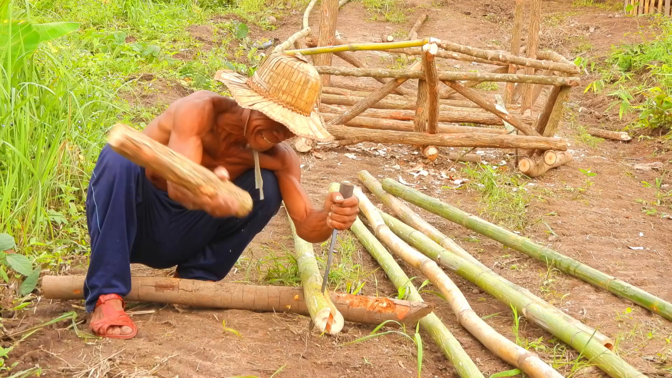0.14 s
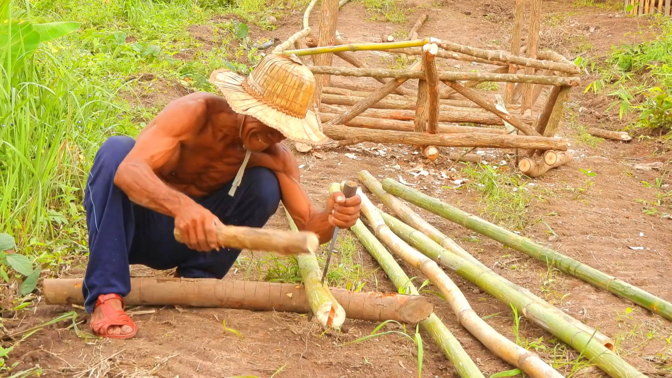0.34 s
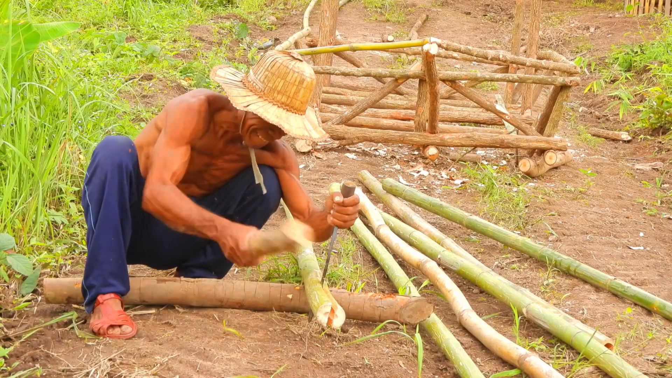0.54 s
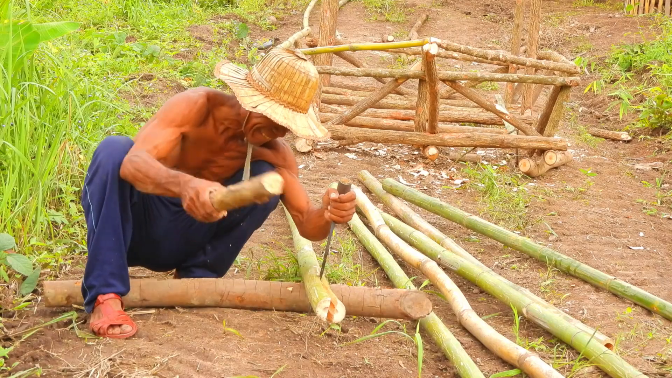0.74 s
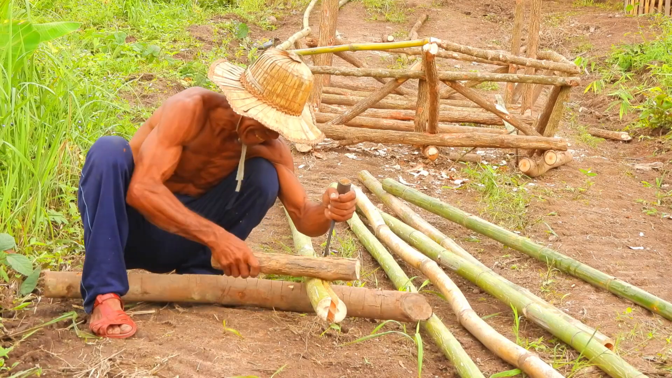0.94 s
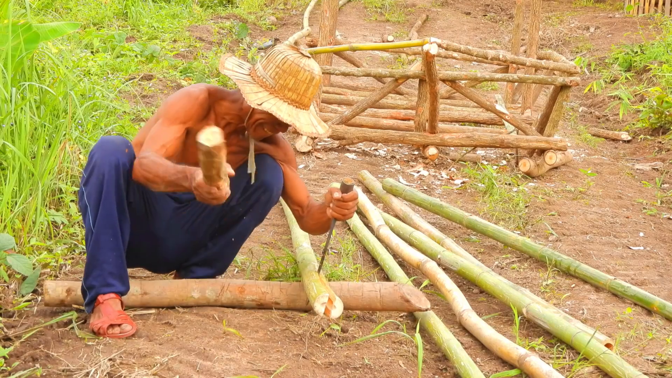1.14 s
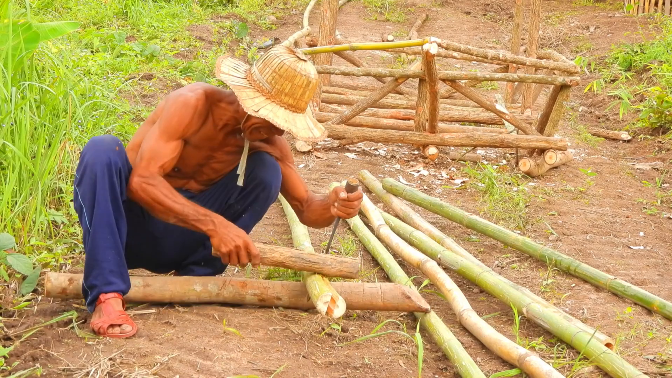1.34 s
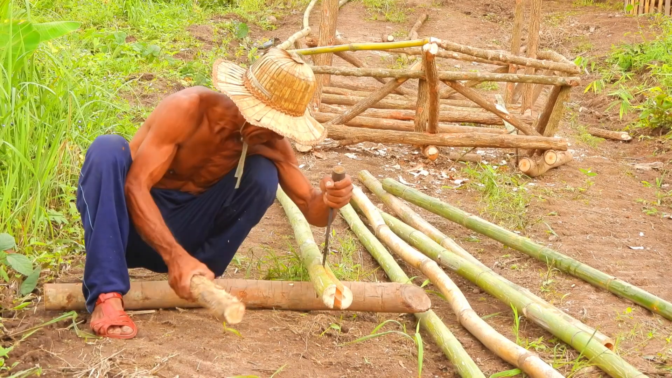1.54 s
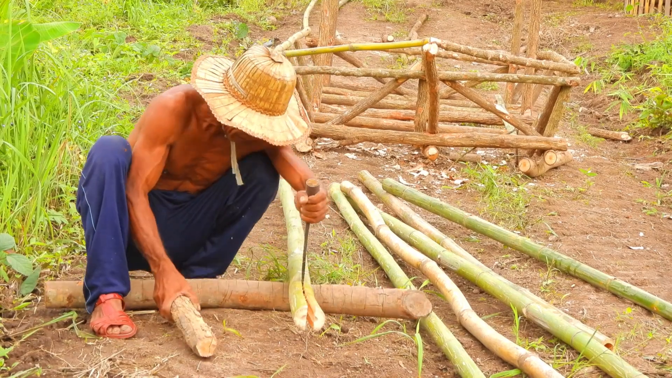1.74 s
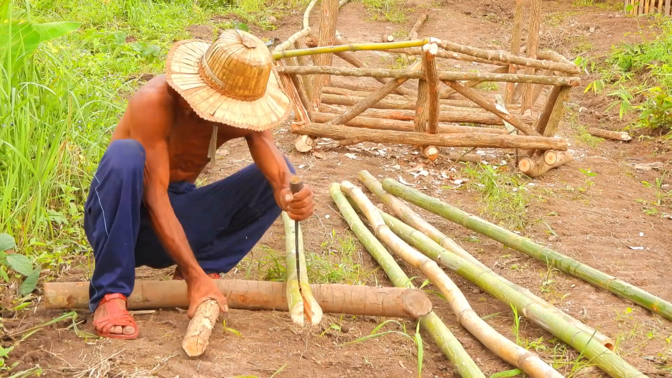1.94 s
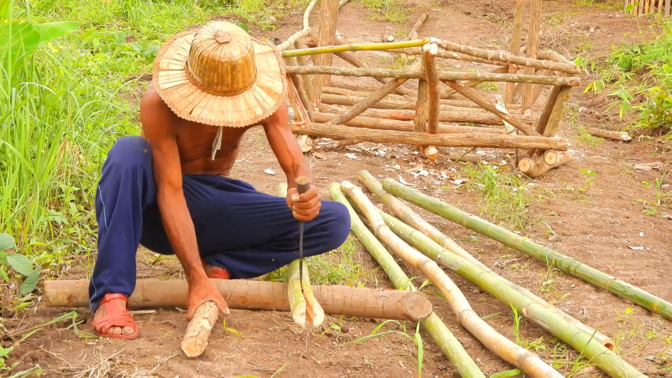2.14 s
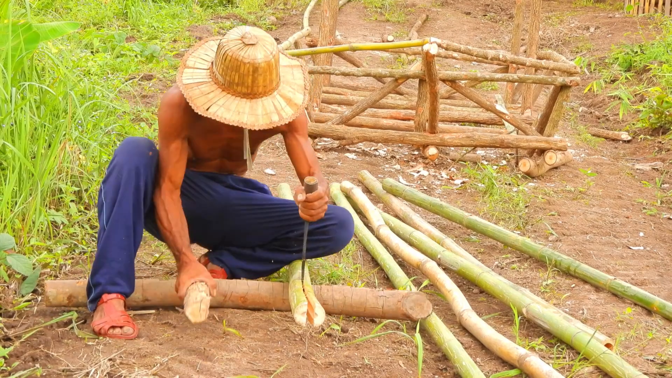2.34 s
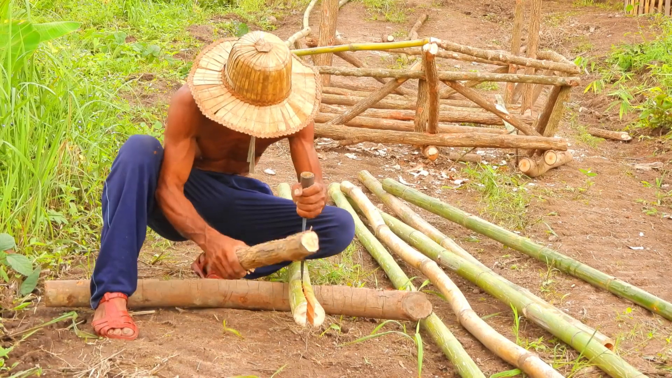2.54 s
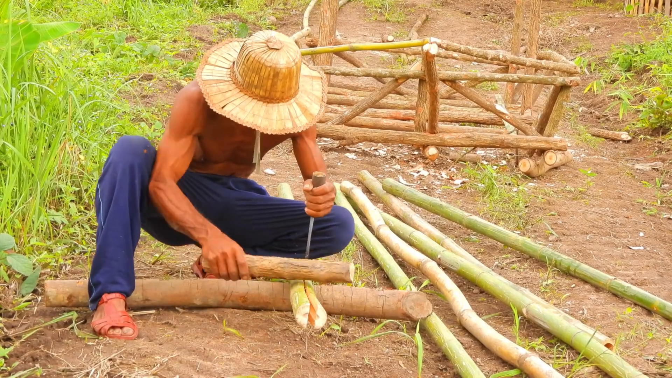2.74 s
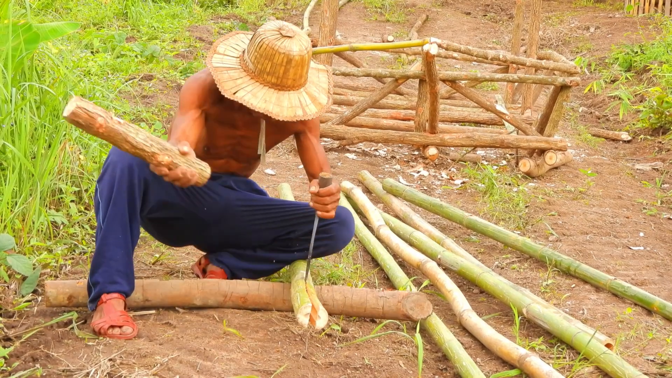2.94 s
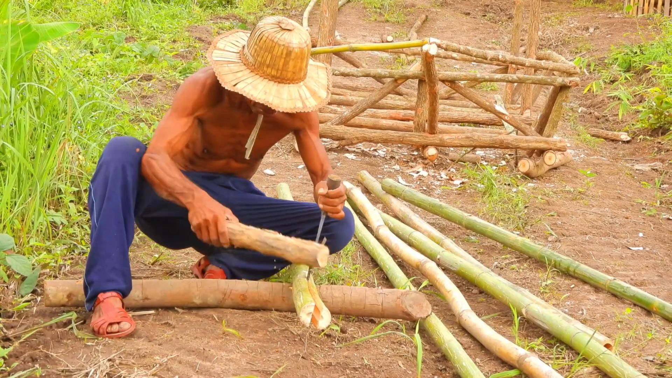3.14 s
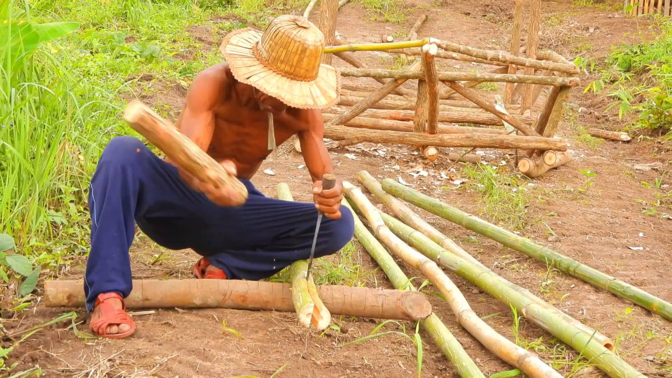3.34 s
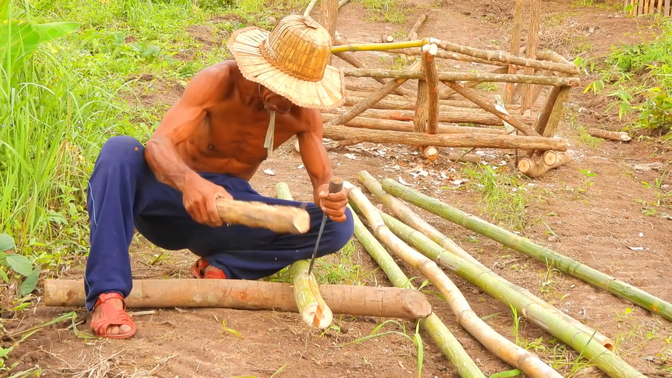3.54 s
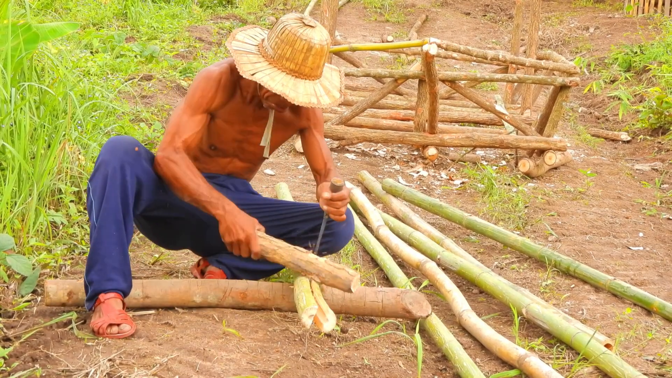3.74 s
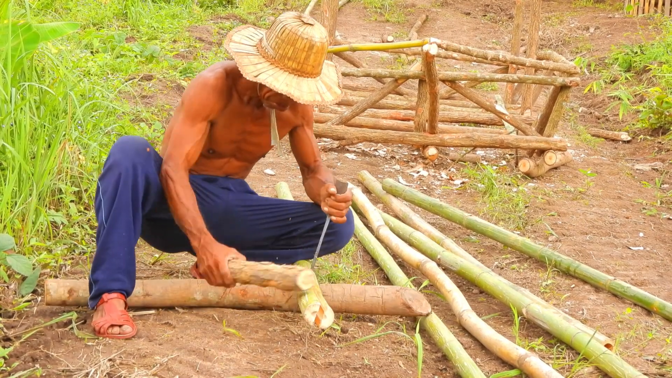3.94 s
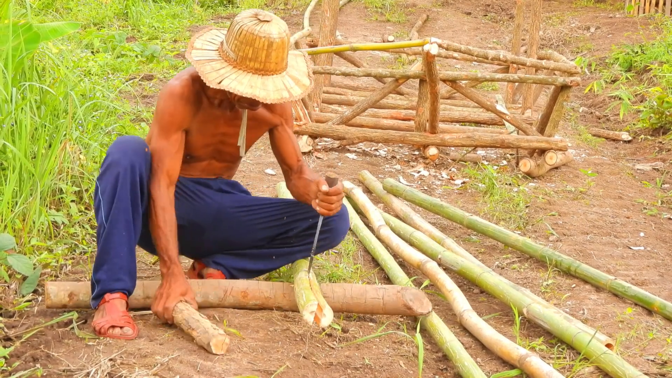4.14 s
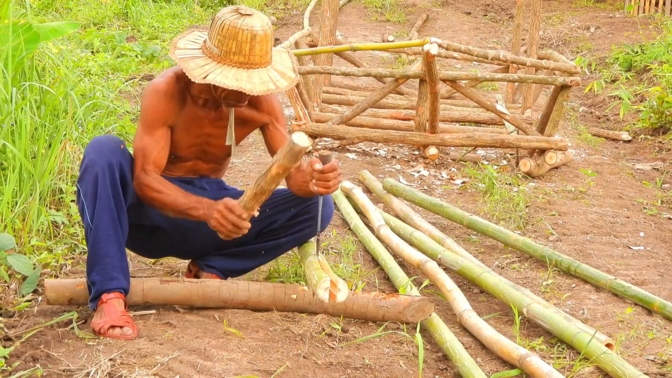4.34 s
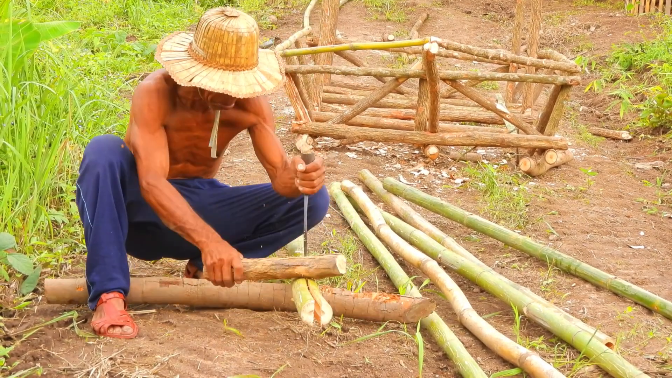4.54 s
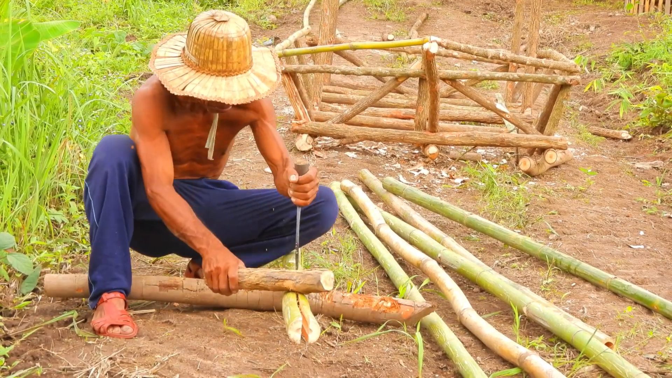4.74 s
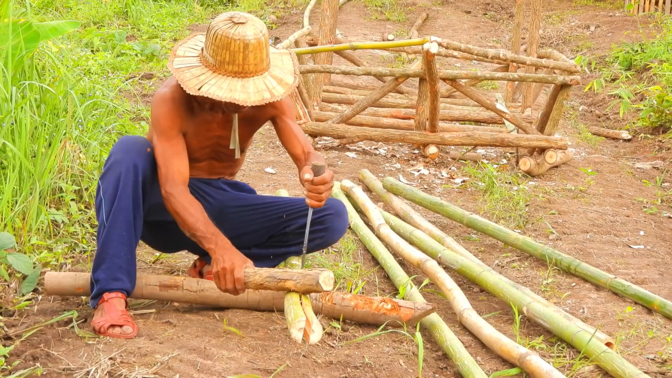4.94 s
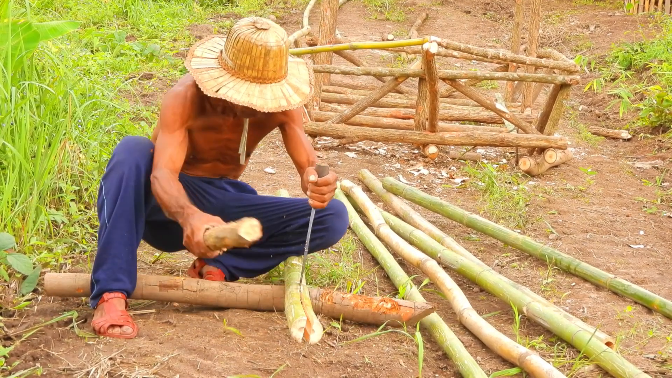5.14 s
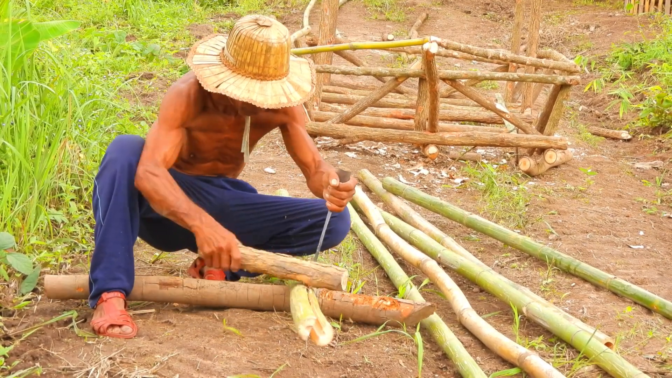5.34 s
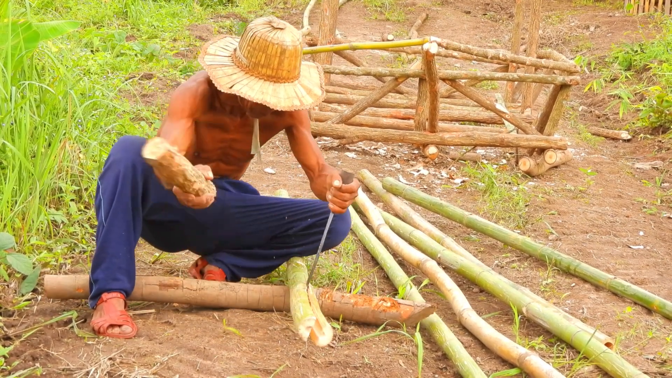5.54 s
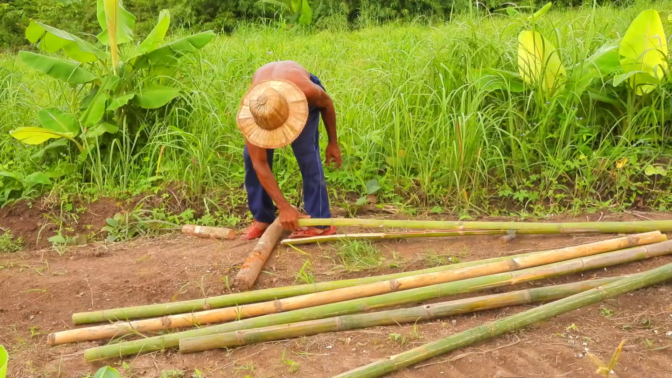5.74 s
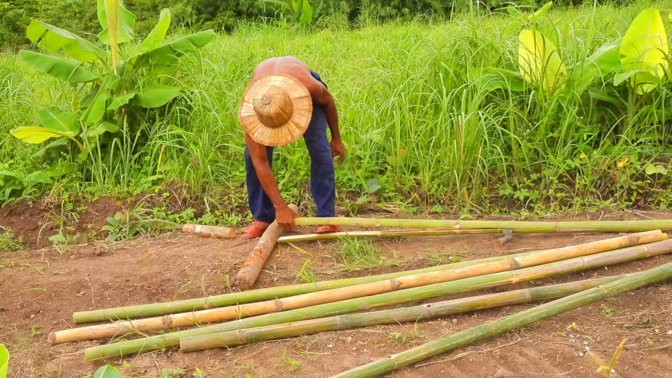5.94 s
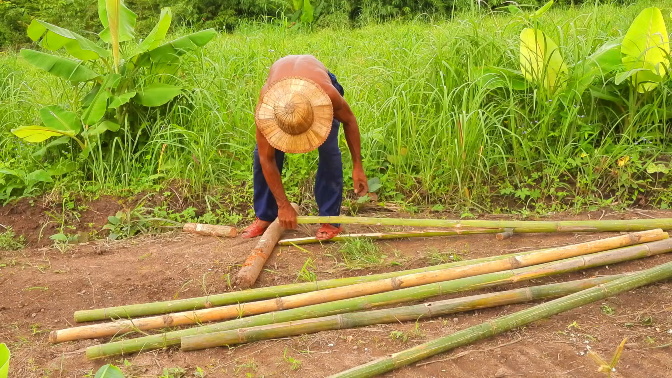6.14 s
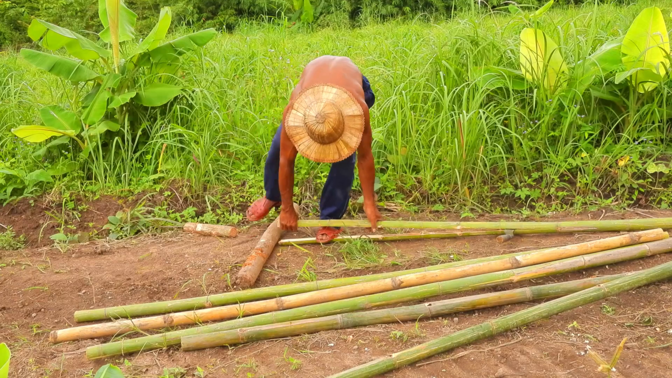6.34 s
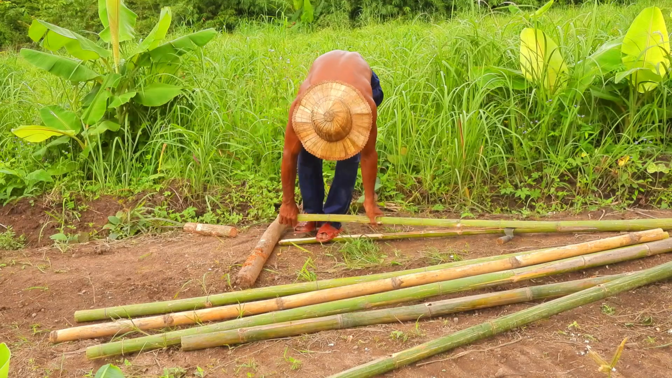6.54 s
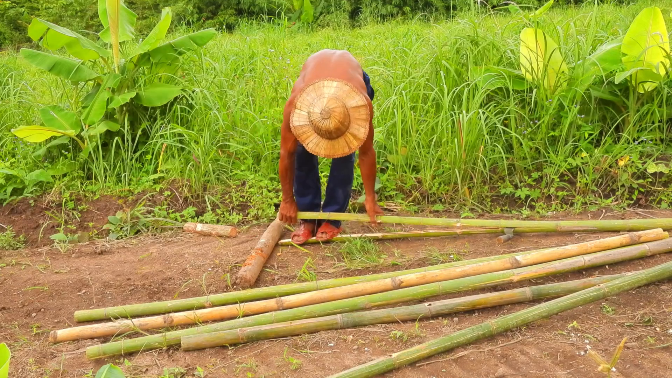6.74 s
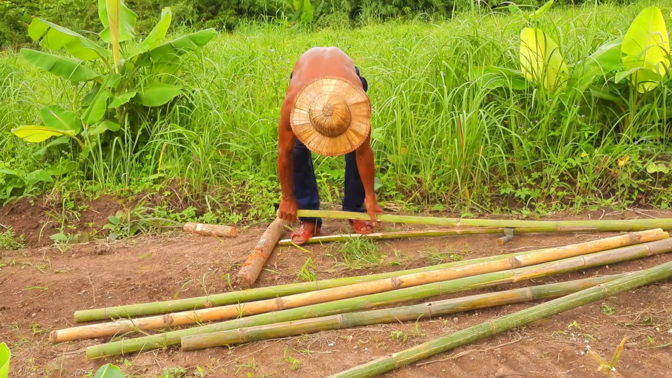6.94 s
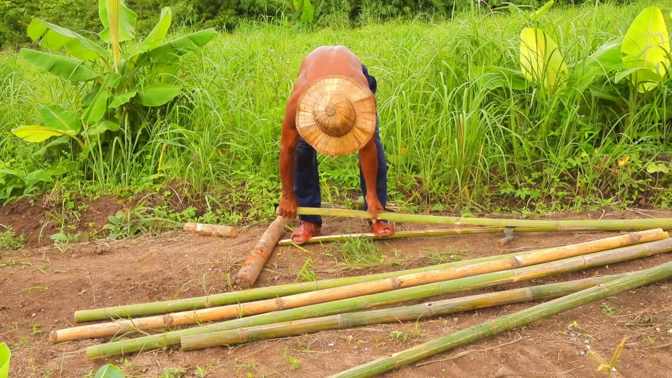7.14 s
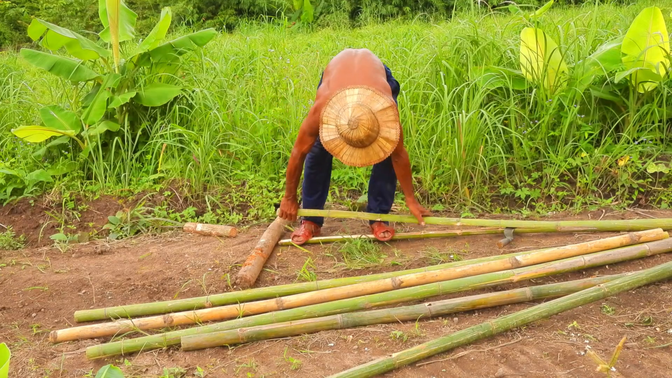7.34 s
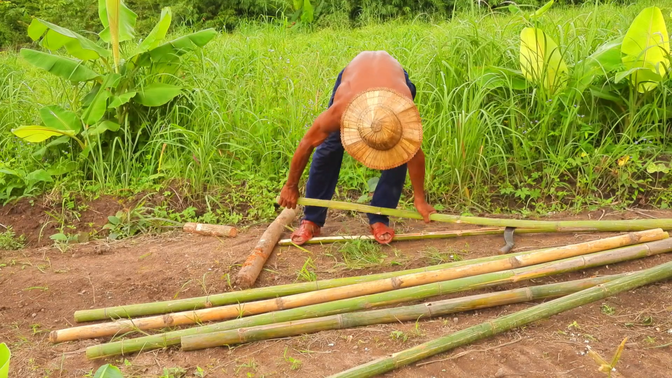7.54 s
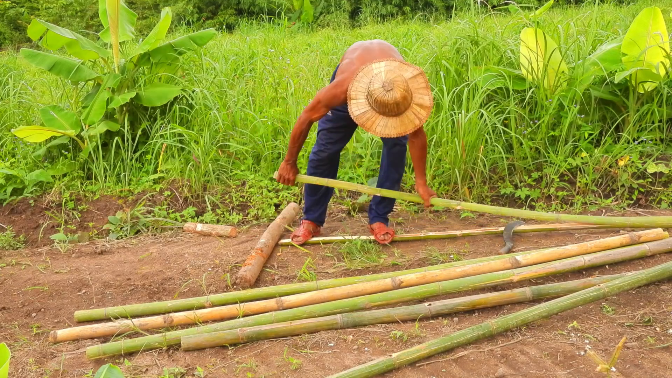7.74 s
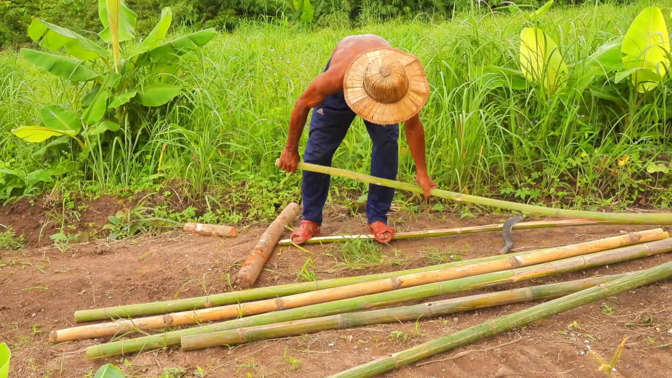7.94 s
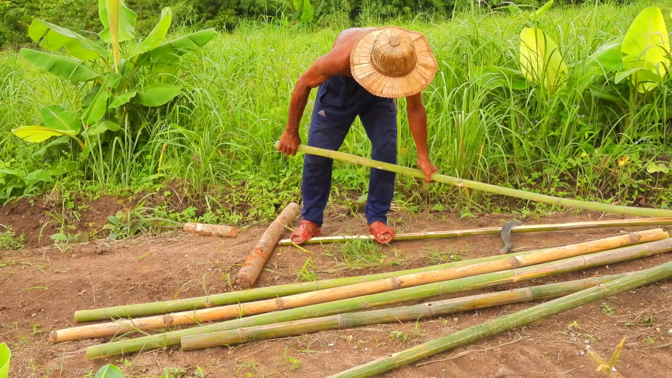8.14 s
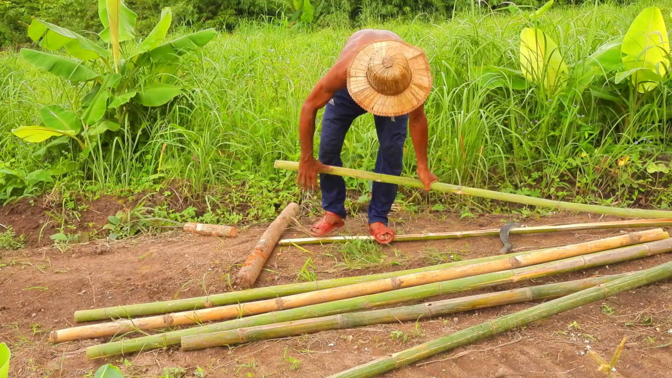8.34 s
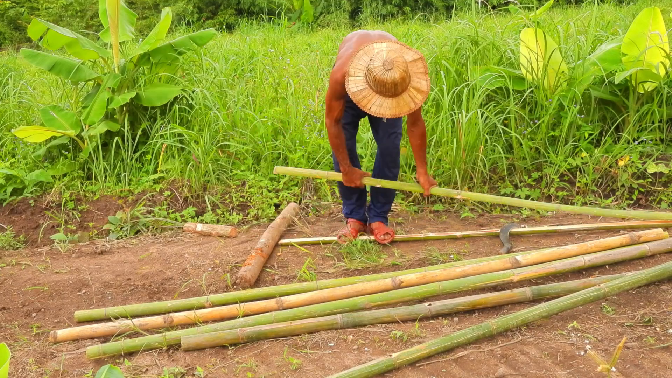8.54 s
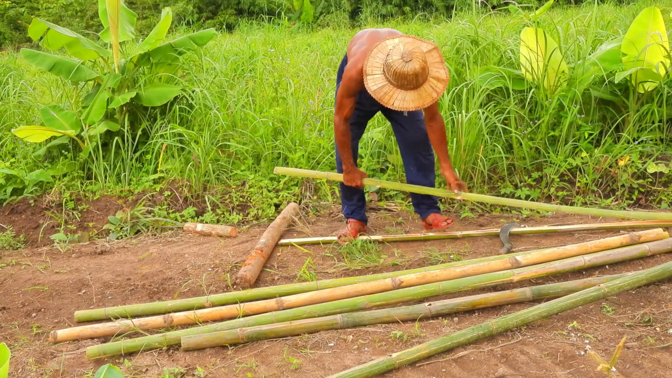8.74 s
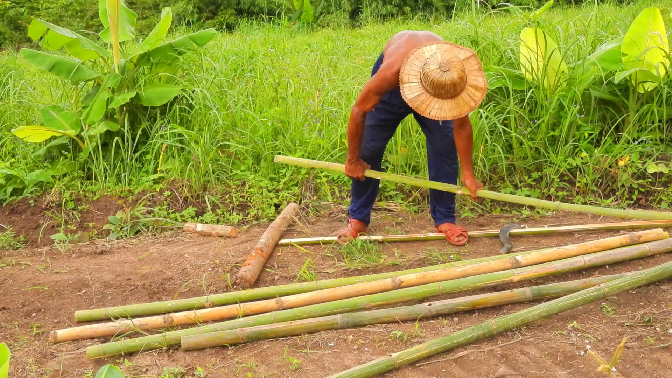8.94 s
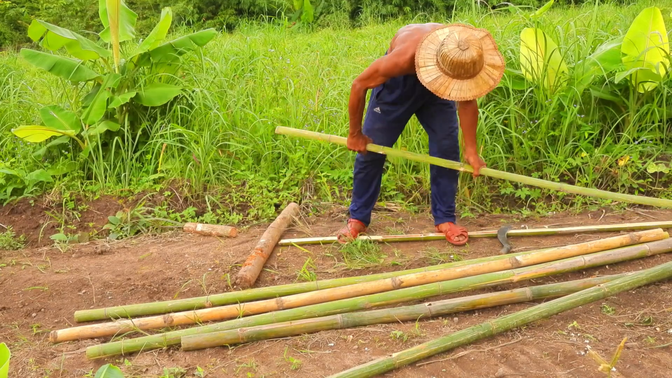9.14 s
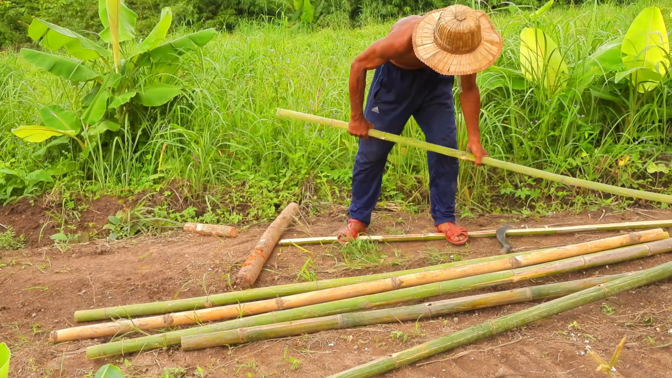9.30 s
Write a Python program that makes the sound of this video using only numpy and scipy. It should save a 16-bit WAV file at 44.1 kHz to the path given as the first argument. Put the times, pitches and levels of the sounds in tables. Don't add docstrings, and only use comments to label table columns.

```python
import sys
import numpy as np
from scipy import signal
from scipy.fft import rfft, irfft, next_fast_len
from scipy.io import wavfile
from scipy.ndimage import uniform_filter1d

SR = 44100
rng = np.random.default_rng(int(sys.argv[2]) if len(sys.argv) > 2 else 0)


def dump(signal):
    limited = np.clip(np.atleast_2d(signal).T, -1, 1)
    pcm = np.round(limited * 32767).astype(np.int16)
    wavfile.write(sys.argv[1], SR, pcm)


def boost(x):
    u = np.asarray(x, float) / 20
    return 10 ** u


N = 417627

# (top_s, peak_db, swell_ms, splinter_t60_ms, splinter_db)
BLOW_EVENTS = [(0.39, -7.3, 8.4, 42, -11), (0.755, -11.3, 7.2, 46, -6), (1.109, -13.6, 7.5, 50, -10),
               (1.474, -12.9, 6.7, 50, -9), (3.22, -9.9, 7.4, 44, -11), (3.586, -10.2, 7.95, 46, -7.5),
               (3.935, -13.2, 7.8, 45, -8.5), (4.644, -4.3, 7, 75, -10), (7.7655, -14, 1.2, 20, -3),
               (8.117, -15, 6.9, 56, -10.5), (9.222, -18.1, 7.85, 50, -9)]
# (pitch_hz, likeness)
WOOD_LIKENESS = [(100, 0.49), (400, 0.67), (1500, 0.56), (4000, 0.27), (15000, 0.18)]
# (pitch_hz, likeness)
FIELD_LIKENESS = [(60, 0.17), (240, 0.23), (950, 0.27), (3770, -0.05), (15000, -0.21)]
# (start_s, end_s)
SILENCE = (5.425, 5.703)
LEVER_S = 7.5


def evened(x):
    return x / np.sqrt(np.mean(x ** 2) + 1e-20)


def read(points, hz):
    f, value = np.transpose(points)
    return np.interp(np.log(hz + 1), np.log(f + 1), value)


def add(mix, s, sound, pan_db):
    part = mix[:, round(s * SR):][:, :sound.shape[1]]
    part += sound[:, :part.shape[1]] * boost([[pan_db / 2], [-pan_db / 2]])


def noise(spectrum, likeness, size):
    hz = np.fft.rfftfreq(size, 1 / SR)
    left, other = rfft(rng.standard_normal((2, size)))
    alike = np.clip(read(likeness, hz), -1, 1)
    right = alike * left + np.sqrt(1 - alike ** 2) * other
    return evened(irfft(np.array([left, right]) * boost(read(spectrum, hz)), size))


def resonate(x, hz, width_hz):
    turn = np.exp(2j * np.pi * np.cumsum(hz * np.ones(N)) / SR)
    r = np.exp(-np.pi * width_hz / SR)
    return evened((turn * signal.lfilter([1], [1, -2 * r, r * r], x / turn)).real)


def wander(per_s):
    knots = rng.standard_normal(1200)
    return np.interp(np.arange(N) / SR * per_s, np.arange(len(knots)), knots)


def smeared(u, swell_s, t60_s):
    after = np.maximum(u, 0)
    tail = boost(-60 * after ** 2 / (after + 1.1 * swell_s) / t60_s)
    return np.where(u < 0, np.exp(-.5 * (u / swell_s) ** 2), tail)


def rung(clock, u, hz, swell_s, t60_s):
    apart = np.arccos(np.clip(read(WOOD_LIKENESS, hz), 0, .8))
    phase = 2 * np.pi * rng.random() + rng.choice([-.5, .5]) * np.array([[1], [-1]]) * apart
    flutter_hz = rng.uniform(1.5, 3.5) * np.sqrt(hz)
    flutter = 1 + .35 * np.sin(2 * np.pi * (flutter_hz * clock + rng.random()))
    return smeared(u, swell_s, t60_s) * flutter * np.sin(2 * np.pi * hz * clock + phase)


def ducking(t):
    sinks_db = [9, 8.65, 3.5, 5.16, 5, 14, 8, 1.5, 18, 16, 13]
    sink_s, recover_db_per_s = 0.1, 15.5
    since = t - np.array(BLOW_EVENTS)[:, :1]
    sunk_db = np.array(sinks_db)[:, None] * np.clip(since / sink_s, 0, 1)
    sunk_db = sunk_db - recover_db_per_s * np.maximum(since - sink_s, 0)
    return -np.maximum(sunk_db.max(0), 0)


def hush():
    # (pitch_hz, level_db per Hz)
    hush_colour = [(35, -50), (60, -37.5), (301, 0), (1340, -0.5), (1780, -4), (2140, -1), (2970, -4),
                   (3940, -8.5), (6140, 0), (7060, -16), (8120, -7.5), (8710, -42), (10800, -28.5),
                   (11800, -45.5), (16000, -49.5)]
    return noise(hush_colour, FIELD_LIKENESS, next_fast_len(N))[:, :N] * boost(0.89 * wander(25))


def crickets(t):
    # (pitch_hz, width_hz, level_db over the hush, throbs_per_s, throb_depth_db)
    cricket_bands = [
        (4790, 90, -12, 50, 2.5),
        (8050, 250, -14, 30, 1.5),
        (10620, 500, -32, 28, 1.5),
        (2900, 25, -21, 7, 2.5),
        (7300, 300, -22, 12.75, 8),
    ]
    out = np.zeros((2, N))
    for hz, width_hz, db, per_s, depth_db in cricket_bands:
        throb = boost(depth_db * np.sin(2 * np.pi * per_s * t + wander(2)) + 1.5 * wander(6))
        farther_db = -5 * (t > SILENCE[0]) * (hz < 5000)
        out += boost(db + farther_db) * throb * resonate(rng.standard_normal((2, N)), hz, width_hz)
    return out


def phrases(t):
    # (top_s, level_db, pitch_hz before the top, pitch_hz at the top)
    cicada_phrases = [(.2, -51, 5900, 5850), (0.679, -52.5, 6050, 5950), (1.42, -53, 6100, 5910),
                      (1.92, -55.5, 5900, 5650), (2.25, -51.5, 5950, 5780), (2.74, -49, 5930, 6100),
                      (3.13, -52.5, 5750, 5750), (3.38, -50.5, 5900, 6050), (3.86, -53.5, 5700, 5900),
                      (4.6, -51.5, 5700, 6050), (5.14, -56.5, 5650, 5668), (5.328, -52, 5933, 6330),
                      (5.97, -53.5, 5850, 6000), (6.662, -53, 6336, 5900), (7.2, -57.5, 6250, 6340),
                      (7.34, -56.5, 5900, 5770), (8.342, -53, 6070, 6300), (8.96, -51.5, 6250, 5830),
                      (9.18, -54, 5850, 6050), (9.44, -45.5, 5950, 5980)]
    rise_s, fall_s, glide_s = 0.14, 0.044, 0.12
    drone_db, drone_hz = -61, 5900
    top, db, from_hz, top_hz = np.transpose(cicada_phrases)[:, :, None]
    u = t - top
    power = boost(2 * db) * np.exp(-(u / np.where(u < 0, rise_s, fall_s)) ** 2)
    hz = top_hz + (from_hz - top_hz) * np.clip(-u / glide_s, 0, 1)
    drone = boost(2 * drone_db)
    total = power.sum(0) + drone
    return 10 * np.log10(total), ((power * hz).sum(0) + drone * drone_hz) / total


def cicadas(t, pitch_hz):
    bursts = (np.cumsum(32 * (1 + 0.18 * wander(7.4))) / SR) % 1
    falling_hz = 1.4 * pitch_hz - 2300 + 350 * (.5 - bursts) + 60 * wander(10.0)
    ribs = rng.standard_normal((2, N)) * (.3 + np.sin(np.pi * bursts) ** 2) * boost(2.5 * wander(15))
    far_gain = 0.96 * boost(3 * wander(5.9) - 5.8 * (t > SILENCE[0]))
    far = far_gain * resonate(rng.standard_normal((2, N)), 5680, 120)
    return resonate(ribs, falling_hz, 450) + far


def patchy(field_sound, t, hush_db):
    kept = [(3700, 0), (4000, -5), (4300, 0), (5050, 0), (5250, -5), (5450, 0),
            (8200, 0), (8400, -12), (10000, -8), (10300, 0), (11400, 0), (11700, -30)]
    patch_depth = [(150, 3), (800, 2), (8300, 2), (9000, 6), (10300, 3), (11000, 3), (11600, 6)]  # (Hz, dB)
    hz, s, z = signal.stft(field_sound, SR, nperseg=1024, noverlap=768)
    patches = uniform_filter1d(rng.standard_normal(z.shape[1:]), 5, 0)
    patches = evened(uniform_filter1d(patches, 8, 1))
    thinning = (0.31 * (hz > 3100) + .3 * (hz < 600))[:, None]
    thinned_db = thinning * np.minimum(np.interp(s, t, hush_db) + 58.0, 0)
    z = z * boost(read(kept, hz)[:, None] + read(patch_depth, hz)[:, None] * patches + thinned_db)
    return signal.istft(z, SR, nperseg=1024, noverlap=768)[1][:, :N]


def field():
    t = np.arange(N) / SR
    s = t[::64]
    ducked_db, cicada_db, cicada_hz = (np.interp(t, s, curve) for curve in (ducking(s), *phrases(s)))
    hush_db = -58 + 1.5 * (t > SILENCE[0]) + ducked_db
    both = boost(hush_db - 0.02) * (hush() + crickets(t))
    both += boost(cicada_db + ducked_db - 5.0) * cicadas(t, cicada_hz)
    return patchy(both, t, hush_db)


def birds(mix):
    # (start_s, length_s, start_hz, end_hz, level_db)
    whistles = [(2.12, .25, 2420, 2160, -63), (2.1, .1, 830, 820, -62), (1.98, .25, 1650, 1620, -69),
                (2.5, .15, 1540, 1500, -66), (2.87, .22, 2350, 2150, -70), (6.74, .2, 2300, 2150, -61),
                (8.39, .23, 2330, 2170, -68), (2.57, .25, 460, 460, -62), (.44, .12, 2400, 2380, -65),
                (.57, .1, 2740, 2730, -71), (5.3, .13, 2900, 2880, -61), (8.97, .16, 2890, 2740, -52),
                (9.1, .12, 1150, 1060, -55), (9.22, .18, 1150, 1130, -58), (9.25, .07, 3900, 3900, -64),
                (9.225, .08, 2150, 2150, -52), (9.25, .1, 2740, 2720, -60), (9.24, .07, 3150, 3150, -61),
                (7.77, .12, 2730, 2720, -67), (7.85, .1, 2720, 2720, -73), (7.765, .07, 3140, 3130, -60),
                (7.8, .1, 1150, 1140, -69), (7.17, .04, 3400, 3300, -60), (4.2, .45, 2920, 2900, -66),
                (4.75, .7, 2910, 2890, -66)]
    for s, length_s, start_hz, end_hz, db in whistles:
        u = np.arange(round(length_s * SR)) / (length_s * SR)
        blur_hz = .12 * end_hz * uniform_filter1d(rng.standard_normal(len(u)), 300)
        hz = end_hz + (start_hz - end_hz) * (1 - u) ** 2.2 + blur_hz
        flutter_turns = u * length_s * rng.uniform(15, 40, (2, 1)) + rng.random((2, 1))
        flutter = 1 + .5 * np.sin(2 * np.pi * flutter_turns)
        tone = np.sin(2 * np.pi * (np.cumsum(hz) / SR + .2 * rng.random((2, 1))))
        add(mix, s, boost(db - 1.5) * tone * flutter * signal.windows.tukey(len(u), .5), 0)


def rustles(mix):
    # (middle_s, swell_s, level_db, brightest_hz)
    brushes = [(1.884, .009, -47.5, 5940), (2.86, 0.01, -54, 8000), (6.78, 0.2, -63, 634),
               (5.948, 0.012, -55, 1980), (6.41, 0.044, -60, 3620), (6.88, 0.036, -58.5, 3750),
               (7.28, 0.015, -68, 6000), (6.64, 0.05, -69, 6000), (4.105, 0.004, -58, 4000),
               (1.78, 0.025, -69, 6000), (7.705, 0.015, -44.5, 2350), (7.756, 0.008, -31, 1570),
               (9.472, 0.0064, -40, 3000)]
    u = np.arange(8192) / SR - .09
    for s, swell_s, db, hz in brushes:
        colour = [(.1 * hz, -22), (.5 * hz, -5), (hz, 0), (1.7 * hz, -12), (min(3.6 * hz, 16000), -40)]
        brush = noise(colour, WOOD_LIKENESS, len(u))
        steps = np.repeat(rng.standard_normal(128), 64)
        grains = boost(2.2 * evened(uniform_filter1d(steps, size=64)))
        add(mix, s + u[0], boost(db) * brush * grains * np.exp(-.5 * (u / swell_s) ** 2), 0)


def knock(row, swell_s, top_hz):
    # (pitch_hz, level_db per Hz)
    snap_colour = [(59, -73), (100, -36.5), (535, -29), (836, -8), (1250, -9), (2040, -4), (2750, -11),
                   (2990, -7.5), (9210, -16), (16000, -45)]
    s, db, hz, t60_s, snap_db = row
    u = np.arange(8192) / SR - .03
    thud = rung(u, u, hz, swell_s, t60_s)
    thud = thud + 0.53 * rung(u, u, 1.374 * hz, swell_s, 0.82 * t60_s)
    thud = thud + 0.14 * rung(u, u, 2.1 * hz, swell_s, 0.43 * t60_s)
    snap = boost(snap_db) * noise(snap_colour, WOOD_LIKENESS, len(u)) * smeared(u, swell_s, t60_s)
    snap = signal.lfilter(*signal.butter(2, top_hz, fs=SR), snap)
    pan_db = -0.5 if s > LEVER_S else .5
    return s + 1.8 * swell_s + u[0], boost(db - 8) * (thud + snap), pan_db


def knocks_and_snaps(mix):
    # (start_s, peak_db, ring_hz, t60_s, snap_db)
    dull_knocks = [(1.873, -37, 282, 0.25, -9), (1.89, -34, 200, 0.12, -12), (1.877, -36, 590, 0.1, -4),
                   (2.86, -43, 270, 0.1, 1), (2.865, -48, 1150, 0.07, -3), (4.108, -48, 750, 0.052, 0.5),
                   (4.249, -40, 230, 0.029, -7), (5.284, -24.5, 625, 0.01, -8),
                   (5.362, -33, 740, 0.028, -25), (5.371, -31, 620, 0.03, -15),
                   (5.955, -40, 700, 0.04, -14), (6.112, -38, 350, 0.03, -10),
                   (5.783, -36, 585, 0.04, -10.5), (6.109, -33.5, 672, 0.06, -26),
                   (8.932, -34, 980, 0.05, -3), (8.949, -35, 940, 0.049, -4), (9.268, -26, 966, 0.04, -6),
                   (9.255, -34, 1280, 0.06, -8), (9.172, -48, 1500, 0.03, 4)]
    # (start_s, peak_db, ring_hz, t60_s, snap_db)
    fibre_snaps = [(6.539, -54, 754, 0.061, 8), (6.726, -50, 774, 0.084, 7.5),
                   (7.538, -40.5, 1390, 0.055, 4), (7.532, -44, 820, 0.08, -6), (7.585, -46, 874, 0.1, 5),
                   (7.597, -46, 1900, 0.06, 3), (7.651, -39.5, 1950, 0.0359, 8),
                   (7.688, -38.5, 2100, 0.08, 2), (7.703, -38, 2050, 0.06, 2), (7.747, -28, 1330, 0.04, -2),
                   (7.717, -17, 2040, 0.022, 2), (7.729, -27, 2000, 0.04, 5), (7.808, -38, 930, 0.03, -5),
                   (8.038, -61, 1640, 0.15, 6), (8.058, -56.5, 1300, 0.04, 6), (9.199, -32, 1000, 0.03, 2),
                   (6.87, -56, 900, 0.03, 8)]
    # (start_s, peak_db, ring_hz, t60_s, snap_db)
    pole_burst = (4.6375, -10, 1550, .02, -6)
    hardest_s = BLOW_EVENTS[7][0]
    for row in dull_knocks:
        add(mix, *knock(row, .0018 if hardest_s < row[0] < LEVER_S else .0032, 2340))
    for row in fibre_snaps:
        add(mix, *knock(row, 0.001, 15000))
    add(mix, *knock(pole_burst, .0008, 15500))


def through(x, ring_hz, width_hz, top_db):
    between_db = -4
    hz = np.fft.rfftfreq(x.shape[1], 1 / SR)
    near = (1 / (1 + ((hz - np.array(ring_hz)[:, None]) / width_hz) ** 2)).max(0)
    shape_db = between_db * (1 - near) * (hz < 5500) + top_db * np.clip(hz / 7000 - 1, 0, 1)
    return irfft(rfft(x) * boost(shape_db), x.shape[1])


def splintering(clock, u, ring_hz, swell_s, t60_s, treble_db, top_db):
    # (pitch_hz, level_db per Hz)
    torn_colour = [(35, -75), (60, -53), (227, -16), (417, -12), (715, -4), (1040, -5.5), (1220, -4),
                   (2000, -9.5), (3760, -19.5), (4030, -21.5), (4750, -19.5), (6400, -22.5), (16000, -46)]
    torn = through(noise(torn_colour, WOOD_LIKENESS, len(u)), ring_hz, 60, top_db)
    dull = signal.lfilter(*signal.butter(3, 5500, fs=SR), torn)
    hiss = boost(treble_db - 3) * (torn - dull) * smeared(clock, 1.25 * swell_s, 0.7 * t60_s)
    return dull * smeared(u, swell_s, 0.95 * t60_s) + hiss


def field_edge(clock, ring_hz, swell_s, echo_db):
    far_colour = [(100, -30.5), (300, -12.5), (1200, -0.5), (4000, -9), (9000, -34), (12000, -60)]  # (Hz, dB)
    answer = boost(echo_db - 44.5) * smeared(clock - .065, 0.0096, 0.047)
    answer = answer + boost(-41) * smeared(clock, swell_s, 0.76)
    return through(noise(far_colour, FIELD_LIKENESS, len(clock)), ring_hz, 35, 0) * answer


def blow(event, rings, thud, walls, bearing):
    s, db, swell_ms, t60_ms, splinter_db = event
    thud_db, thud_hz, thud_t60_s, treble_db = thud
    wall_db, hold_ms, top_db, echo_db, pan_db = bearing
    clock = np.arange(16384) / SR - .05
    u = clock - np.clip(clock, 0, max(hold_ms, 0) / 1000)
    swell_s = swell_ms / 1000
    rings = list(rings) + [(hz, d + wall_db, 3.5 / width_hz) for hz, width_hz, d in walls]
    ring_hz = [ring[0] for ring in rings]
    body = sum(boost(d) * rung(clock, u, hz, 1.057 * swell_s, 0.6 * np.clip(t60_s, .02, .16))
               for hz, d, t60_s in rings)
    crack = splintering(clock, u, ring_hz, swell_s, t60_ms / 1000, treble_db, top_db)
    sound = body / abs(body).max() + boost(splinter_db + 2.1) * crack
    sound = boost(db) * (sound + field_edge(clock, ring_hz, swell_s, echo_db))
    earth = boost(thud_db - 3) * rung(clock, u, thud_hz, 1.4 * swell_s, thud_t60_s)
    return s + clock[0], sound + earth, pan_db


def blows(mix):
    # (pitch_hz, level_db, t60_s)
    early_rings = [
        [(716.0, 3.7, 0.067), (850.0, -11.5, 0.2), (1220.0, 4.1, 0.04), (1387.0, -8.5, 0.1),
         (1630.0, -10.3, 0.04), (1920.0, -15.1, 0.072), (2670.0, -14.5, 0.058), (3220.0, -11.3, 0.055)],
        [(600.0, -1.0, 0.04), (833.0, -6.5, 0.079), (1193.0, -2.4, 0.031), (1810.0, -0.9, 0.038),
         (1490.0, -13.2, 0.07), (2060.0, -14.3, 0.06), (2350.0, -4.8, 0.043), (2970.0, -12.4, 0.016)],
        [(258.0, -10.9, 0.04), (585.0, 1.2, 0.084), (754.0, -6.0, 0.071), (1054.0, -0.1, 0.06),
         (1190.0, -4.1, 0.066), (1330.0, -4.4, 0.08), (1940.0, -14.8, 0.07), (2420.0, -7.4, 0.029)],
        [(346.0, -7.3, 0.078), (668.0, 3.6, 0.075), (797.0, 0.8, 0.13), (1030.0, -9.8, 0.093),
         (1166.0, -17.6, 0.17), (1430.0, -7.0, 0.05), (1810.0, -3.4, 0.05)],
    ]
    # (pitch_hz, level_db, t60_s)
    later_rings = [
        [(576.0, 4.9, 0.05), (230.0, -1.0, 0.05), (440.0, -2.2, 0.05), (770.0, 2.1, 0.13), (913.0, 1.8, 0.077),
         (1160.0, -8.9, 0.05), (1300.0, -5.8, 0.06), (1477.0, 0.2, 0.031), (1770.0, 5.3, 0.037),
         (2190.0, -2.5, 0.044), (3690.0, -6.0, 0.041)],
        [(545.0, -3.1, 0.032), (705.0, 3.0, 0.043), (980.0, -6.6, 0.034), (1180.0, -10.7, 0.07),
         (1310.0, -5.3, 0.06), (1873.0, -1.5, 0.038), (2066.0, -8.3, 0.069), (2514.0, -12.8, 0.058),
         (3670.0, -19.0, 0.045)],
        [(792.0, 0.4, 0.077), (1127.0, -4.1, 0.1), (1250.0, -11.7, 0.063), (2080.0, -8.6, 0.049),
         (2380.0, -11.7, 0.056), (2820.0, -19.6, 0.058)],
        [(761.0, 0.0, 0.16), (560.0, -12.1, 0.08), (926.0, -5.1, 0.11), (1367.0, -4.2, 0.092),
         (1643.0, -2.1, 0.091), (1960.0, -6.0, 0.079), (4650.0, -19.5, 0.05), (2390.0, -10.5, 0.065),
         (3650.0, -12.4, 0.046)],
    ]
    # (pitch_hz, level_db, t60_s)
    half_rings = [
        [(890.0, 13.1, 0.043), (1474.0, 26.3, 0.017), (1950.0, 24.6, 0.026), (2080.0, -14.4, 0.043),
         (2200.0, -3.4, 0.065)],
        [(909.0, -2.4, 0.12), (1250.0, -10.1, 0.15), (538.0, -6.9, 0.07), (1530.0, 4.5, 0.025),
         (1950.0, 5.2, 0.02), (2130.0, -4.0, 0.15), (2369.0, -7.7, 0.049), (2530.0, -7.3, 0.04),
         (2850.0, -12.4, 0.04)],
        [(956.0, 1.5, 0.073), (1370.0, -3.3, 0.072), (1470.0, 3.8, 0.039), (1576.0, 2.4, 0.096),
         (458.0, -6.6, 0.06), (2100.0, -7.1, 0.025), (2050.0, -3.9, 0.16), (3000.0, -0.5, 0.1)],
    ]
    # (thud_db, thud_hz, t60_s, treble_db)
    earth_thuds = [(-37, 340, 0.065, 1), (-26, 330, 0.05, -1.5), (-31, 300, 0.06, 1),
                   (-38, 200, 0.05, -0.5), (-24, 328, 0.13, 1), (-34.5, 240, 0.059, 0.5),
                   (-33.5, 320, 0.066, -1.5), (-24, 300, 0.05, -9), (-32, 83, 0.016, 7),
                   (-38, 368, 0.034, 5), (-38, 295, .07, 6.5)]
    # (pitch_hz, width_hz, level_db)
    wall_rings = [
        [(2340, 130, -2), (2630, 51, -1), (3230, 91, 0), (3410, 35, -5), (4770, 34, -12)],
        [(2730, 42, 0), (2980, 40, -3), (3630, 90, -5), (4690, 69, -7), (5490, 44, -13)],
        [(2080, 39, 0), (2420, 47, -2), (3670, 41, -4), (4290, 110, -10), (4990, 57, -13)],
        [(3050, 35, 0), (3680, 35, -4), (4400, 27, -5), (4820, 48, -3), (5560, 100, -5)],
        [(2720, 60, -7), (3070, 32, -5), (3670, 43, 0), (4320, 98, -5), (5490, 65, -3)],
        [(3170, 52, -3), (3450, 23, -2), (3820, 46, 0), (4220, 54, -4), (4980, 150, -5)],
        [(2910, 66, 0), (3850, 77, -7), (4180, 77, -8), (4940, 42, -14), (5400, 37, -8)],
        [(2590, 33, 0), (3240, 40, -3), (3660, 48, 0), (4610, 51, -3), (5560, 52, -11)],
        [(2550, 73, 0), (2880, 50, -3), (3180, 160, -9), (3760, 160, -10), (5100, 120, -6)],
        [(2890, 96, 0), (3240, 23, -2), (3800, 53, -2), (4040, 32, -5), (5370, 70, -7)],
        [(2700, 82, -5), (2980, 72, 0), (3560, 57, -10), (4760, 38, -13), (5510, 59, -11)],
    ]
    # (wall_ring_db, hold_ms, top_treble_db, echo_db, left_minus_right_db)
    bearings = [(-17, 4, 0, 1, .5), (-16, 4, -4, 2, .7), (-15, 5, -6, 2, .5), (-21, 3, -1, 4, 0),
                (-14, 2, -3, 0, .5), (-22, 3, 0, 6, .2), (-22, 2, -12, 2, -.5), (-21, 1, -2, 0, 1.2),
                (-10, .5, 1, -4, -4), (-16, 1, 0, 0, -1), (-12, 3, 5, 2, -4)]
    pole_rings = early_rings + later_rings + half_rings
    for parts in zip(BLOW_EVENTS, pole_rings, earth_thuds, wall_rings, bearings):
        add(mix, *blow(*parts))


def scene():
    mix = field()
    birds(mix)
    rustles(mix)
    knocks_and_snaps(mix)
    blows(mix)
    return mix


def band_limit(x):
    return signal.sosfilt(signal.butter(12, 15850, fs=SR, output="sos"), x)


def record(dry):
    t = np.arange(N) / SR
    inside_s = np.minimum(t - SILENCE[0], SILENCE[1] - t)
    unmuted = np.cos(np.pi / 2 * np.clip(inside_s / .03, 0, 1)) ** 4
    thin = signal.lfilter(*signal.butter(2, 135, "high", fs=SR), dry)
    return band_limit(thin * unmuted)


dry = scene()
out = record(dry)
dump(out)
```